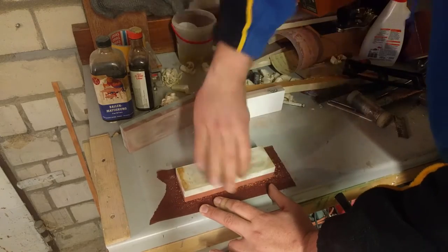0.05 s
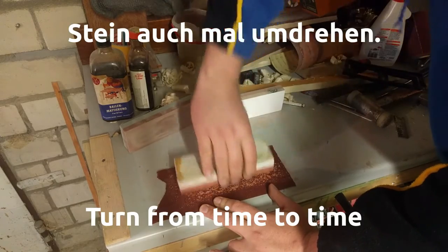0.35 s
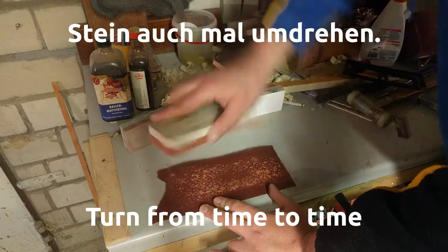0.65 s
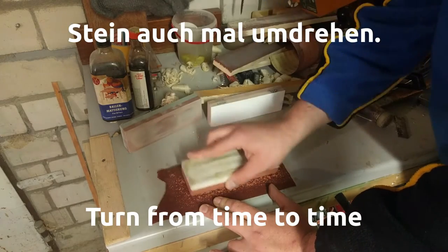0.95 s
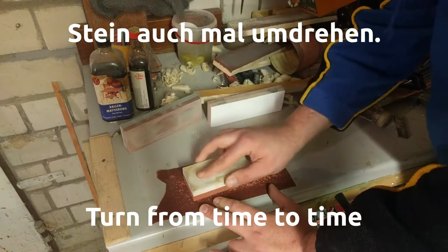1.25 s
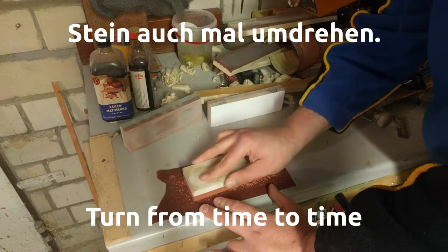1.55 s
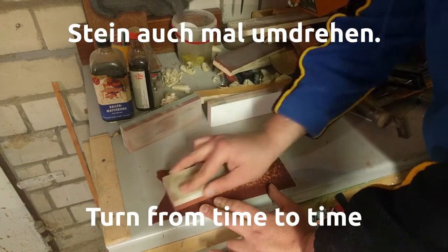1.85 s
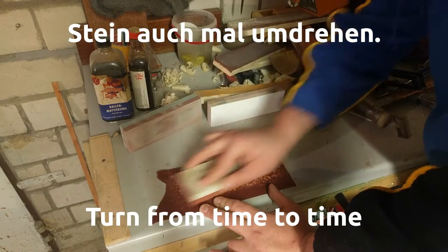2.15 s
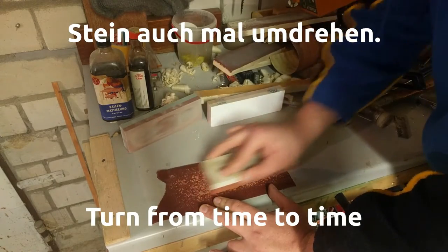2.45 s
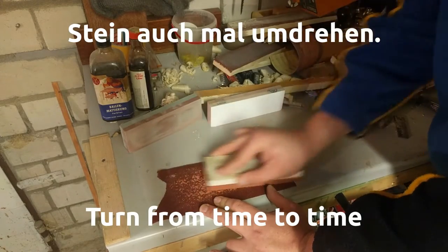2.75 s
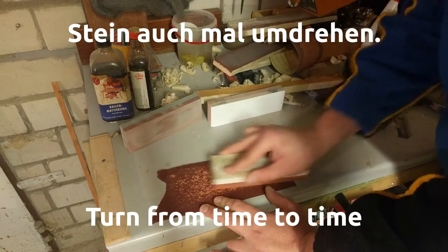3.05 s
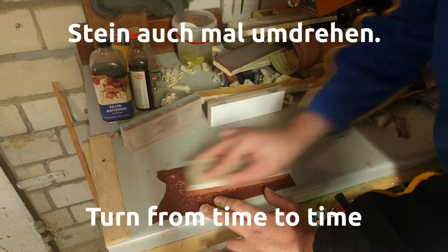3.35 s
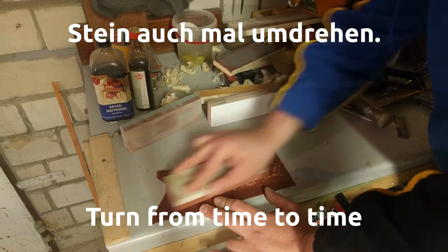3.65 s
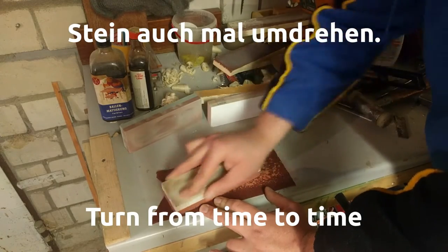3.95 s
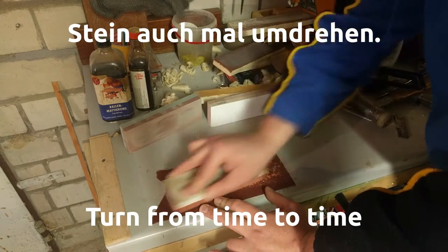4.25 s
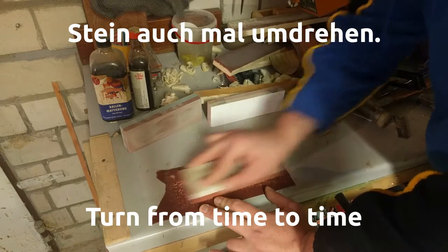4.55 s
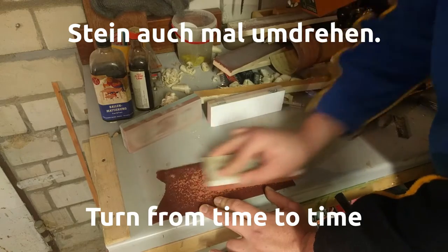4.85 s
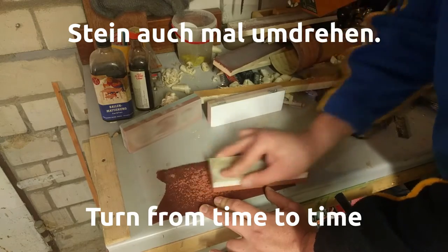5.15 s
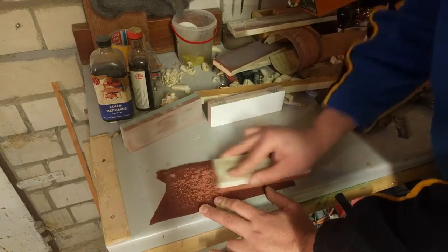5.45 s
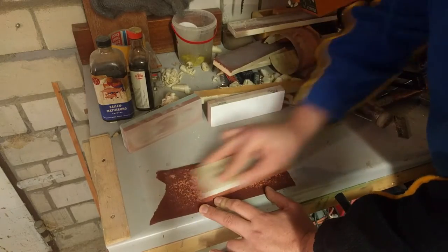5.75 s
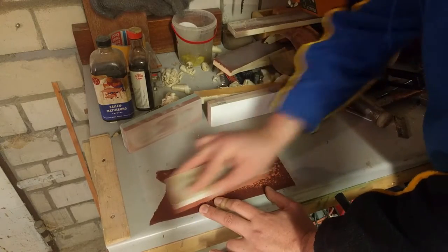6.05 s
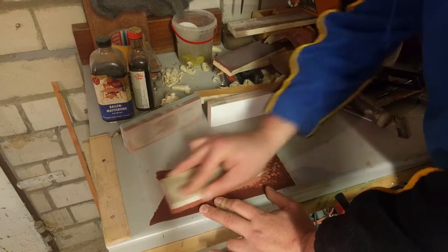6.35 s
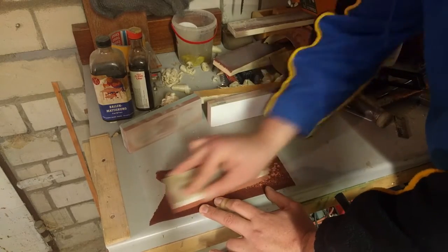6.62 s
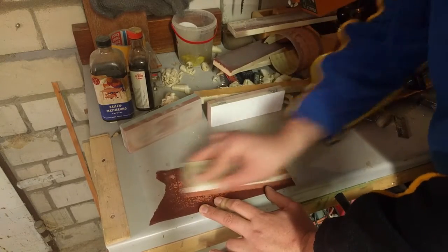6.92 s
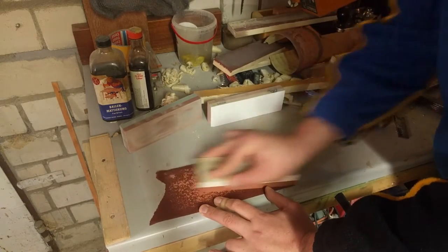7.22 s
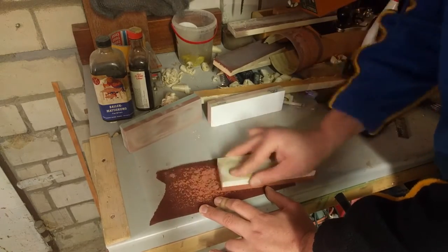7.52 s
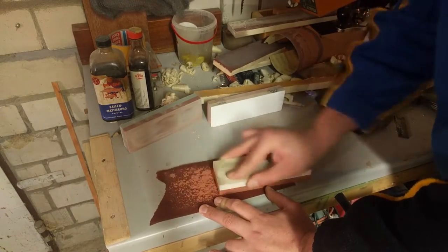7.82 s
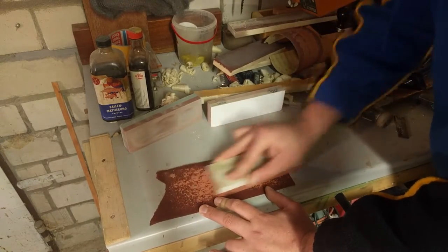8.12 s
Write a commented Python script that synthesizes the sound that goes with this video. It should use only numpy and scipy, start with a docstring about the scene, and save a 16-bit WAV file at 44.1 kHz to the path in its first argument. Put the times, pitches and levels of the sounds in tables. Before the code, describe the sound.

A quiet small workshop, heard close, with a faint sleeve rustle. At about 0.3 seconds a sharpening stone gives a short, bright, gritty scuff as it is lifted off abrasive paper. From about 0.9 to 1.2 seconds it comes down on the workbench in a quick cluster of dull knocks, edge first and then flat, with rasping and tiny cracks of grit. Another brief scuff near 1.5 seconds seats it. From 1.6 seconds a hand rubs the stone back and forth on the paper, about six strokes a second, in an even rhythm. Each stroke is a bright, grainy hiss with a coarse rasp, the push slightly rougher than the pull. The bench drones faintly underneath, a little more at first, and a short room echo fills the tiny rests. The scraping continues steadily until the end, at about 8 seconds.

```python
"""In a quiet workshop a sleeve rustles and a sharpening stone is picked up and turned, scuffing abrasive paper.
Around one second in it knocks down on the workbench, edge first and then flat.
From 1.6 s a hand laps it to and fro, six strokes a second: countless grains catch and snap under the
stone, while the bench drones beneath it and rocks at every turn.
The small room fills the short rests between the strokes, which go on to the end."""
import sys
import numpy as np
from scipy import signal
from scipy.fft import rfft, irfft, next_fast_len
from scipy.io import wavfile
from scipy.ndimage import uniform_filter1d

SR = 44100
rng = np.random.default_rng(int(sys.argv[2]) if len(sys.argv) > 2 else 0)


def wav_out(sig):
    """Save sig, one row per channel (or a flat mono array), as 16-bit PCM at SR to the path in sys.argv[1]."""
    wavfile.write(sys.argv[1], SR, np.round(np.clip(np.atleast_2d(sig).T, -1, 1) * 32767).astype(np.int16))


N = 360738
TIME = np.arange(N) / SR


def amp(db):
    return 10 ** (np.asarray(db) / 20)


def unit(x):
    return x / np.sqrt(np.mean(x ** 2) + 1e-20)


def curve_at(points, hz):
    """Breakpoints joined by straight lines over log frequency."""
    f, value = np.transpose(points)
    return np.interp(np.log(hz + 1), np.log(f + 1), value)


def eq(x, points):
    """Shapes x with an EQ curve in dB."""
    size = next_fast_len(N + SR)
    gain = amp(curve_at(points, np.fft.rfftfreq(size, 1 / SR)))
    return irfft(rfft(x, size) * gain, size)[..., :N]


def envelope(touches):
    """Each rubbing touch starts gently, steepens, holds and dies away."""
    gain = np.zeros(N)
    for start, attack_s, hold_s, release_s, db in touches:
        swell = np.clip((TIME - start) / attack_s, 0, 1) ** 1.54
        release = np.exp(-np.maximum(TIME - start - attack_s - hold_s, 0) / release_s)
        gain += amp(db) * swell * release
    return gain


def wander(hz):
    """A smooth random modulator of unit size, up to about hz."""
    step = 16
    count = N // step + 2
    f = np.fft.rfftfreq(count, step / SR)
    slow = unit(irfft(rfft(rng.standard_normal(count)) * np.exp(-(f / hz) ** 2), count))
    return np.interp(np.arange(N) / step, np.arange(count), np.clip(slow, -2, 2))


def grains(per_s, spread_db):
    """Mid and side trains of tiny snaps: most are small, a few are large."""
    size = amp(spread_db * np.minimum(rng.exponential(1, N), 4.5))
    snaps = rng.random(N) < per_s / SR
    return unit(size * snaps * rng.choice([-1., 1.], (2, N)))


def patchy(x, depth_db, patch_hz, patch_s):
    """The spots where stone meets paper keep changing, so bands swell and fade on their own."""
    hz, t, z = signal.stft(x, SR, nperseg=256)
    across = uniform_filter1d(rng.standard_normal(z.shape[1:]), max(1, round(patch_hz / hz[1])), axis=0)
    field = unit(uniform_filter1d(across, max(1, round(patch_s / t[1])), axis=1))
    return signal.istft(z * amp(depth_db * np.clip(field, -2, 2)), SR, nperseg=256)[1][:, :N]


# Room tone EQ: f/Hz, level/dB
ROOM_TONE_EQ = [(15, -35), (25, 13), (107, 0), (165, -4), (291, 0), (403, -25), (2030, -42), (4690, -23),
                (7030, -8), (9720, -26), (15800, -30)]
def room_tone():
    """A faint bed of rumble with a thin hiss on top."""
    return amp(-73.5) * unit(eq(rng.standard_normal((2, N)), ROOM_TONE_EQ))


# Reverb time of the workshop: f/Hz, t60/s
ROOM_DECAY = [(100, 1), (2000, 0.41), (7000, 0.1), (10000, 0.063), (15000, 0.073)]
def room_reverb(x, wet_db, blur_hz):
    """Adds the diffuse tail: each band stores the energy it is fed and lets it die at its own speed."""
    hz, t, z = signal.stft(x[0], SR, nperseg=256)
    fed = np.abs(uniform_filter1d(abs(z) ** 2, max(1, round(blur_hz / hz[1])), axis=0))
    feedback = amp(-60 * t[1] / curve_at(ROOM_DECAY, hz)) ** 2
    stored = np.array([signal.lfilter([0, 1 - r], [1, -r], band) for r, band in zip(feedback, fed)])
    noise = signal.stft(rng.standard_normal((2, N)), SR, nperseg=256)[2]
    tail = signal.istft(noise / noise.std() * np.sqrt(stored), SR, nperseg=256)[1][:, :N]
    return x + amp(wet_db) * tail


def early_reflections(x, wet_db, decay_s):
    """Adds echoes off the wall, bottles and tools: sparse taps of random sign."""
    t = TIME[:SR // 8]
    taps = rng.choice([-1., 1.], (2, len(t))) * (rng.random((2, len(t))) < 2500 / SR)
    taps *= (t > .002) * np.exp(-t / decay_s)
    return x + amp(wet_db) * signal.oaconvolve(x, taps / np.linalg.norm(taps[0]), axes=1)[:, :N]


# Cloth EQ: f/Hz, level/dB
CLOTH_EQ = [(25, -22), (70, 9.5), (250, 1.5), (700, -4), (2000, -9.5), (4500, -15), (7000, -5),
            (10000, -17), (15800, -14)]
# Sleeve moves: t/s, attack/s, hold/s, release/s, level/dB
SLEEVE_MOVES = [(0, 0.0018, .002, .022, -58.5), (.21, 0.074, 0.42, .035, -59.5),
                (.76, 0.026, 0.6, 0.21, -61.5), (1.38, .12, .01, .17, -52)]
def sleeve():
    """Cloth rustles as the arm reaches, turns the stone and settles."""
    return unit(eq(grains(per_s=4900, spread_db=1.0), CLOTH_EQ)) * envelope(SLEEVE_MOVES)


# Resonances of the bench: f/Hz, level/dB, t60/s
BENCH_MODES = [(64, -2, 0.03), (82.3, -15, 0.41), (90.8, -12, 0.33), (200, -12, 0.093), (227, -4, 0.042),
               (304.4, -5, 0.13), (317, -3.5, 0.11), (375, 1.5, 0.048), (526, -6, 0.17), (694, -4.5, 0.064),
               (766, -9.5, 0.08), (914, -2.5, 0.072), (1219, 2.5, 0.045), (1526, -7.5, 0.062),
               (2127, 1, 0.069)]
def bench(force):
    """The bench's modes answer a force and echo round the room; the slowest motion radiates nothing."""
    t = TIME[:SR // 2]
    signs = (-1) ** ((np.arange(len(BENCH_MODES)) + 1) // 2)  # the close bass pair starts in step
    ring = sum(sign * amp(db - 60 * t / t60) * np.sin(2 * np.pi * hz * t)
               for sign, (hz, db, t60) in zip(signs, BENCH_MODES))
    echo = signal.lfilter(*signal.butter(3, [260, 1150], "band", fs=SR), rng.standard_normal(len(t)))
    ring += amp(-1.5 - 60 * t / 0.24) * unit(echo) * (1 - np.exp(-t / 0.0036))
    radiated = signal.lfilter(*signal.butter(2, 48, "high", fs=SR), ring)
    return signal.oaconvolve(force, radiated)[:N]


def bench_shake(speed, pressure, load):
    """Friction shakes the bench in mid-stroke; it rocks as the hand slows to turn."""
    friction = patchy(grains(per_s=6000, spread_db=2.5), depth_db=3.5, patch_hz=400, patch_s=0.055)[0]
    friction = signal.lfilter(*signal.butter(2, 260, "high", fs=SR), friction)
    friction *= amp(-71 + 2 * speed + 2 * wander(hz=22.4)) * load
    rocking = wander(hz=120) * amp(-85.5 - 18 * speed + 4.1 * wander(hz=7.4))
    return pressure * (friction + rocking)


# Hits on the bench, edge first and then flat: t/s, level/dB, contact/s
LANDING_HITS = [(0.967, -30.5, 0.00052), (.98, -38, 0.0037), (1.048, -24, 0.0022), (1.133, -29.5, 0.00027),
                (1.144, -18, 0.0019)]
def stone_landing():
    """The force of the landing stone, cushioned by the paper: longer contact, duller thump."""
    force = np.zeros(N)
    for start, db, contact_s in LANDING_HITS:
        age = np.maximum(TIME - start, 0) / contact_s
        blow = age * np.exp(-np.minimum(age, 40))
        force += amp(db) * blow / blow.sum()
    return force


# Bright scuff EQ: f/Hz, level/dB
SCUFF_EQ = [(200, -28), (1200, -26.5), (2200, -20), (3500, -13), (5200, -4.5), (6700, 7.5), (7400, 3),
            (8500, -6), (11000, -16), (15800, -22)]
# Scuff cues: t/s, attack/s, hold/s, release/s, level/dB
SCUFF_CUES = [(0, 0.0014, .002, 0.016, -59), (.255, 0.016, .002, 0.016, -61), (.322, 0.06, .026, .011, -22),
              (.42, 0.02, .008, 0.015, -33), (.56, 0.027, .002, 0.021, -55.5),
              (.64, 0.033, .002, 0.023, -58), (.772, 0.017, .002, 0.0089, -46),
              (.932, 0.0087, .072, .055, -28), (1.06, 0.071, .002, 0.0098, -29.5),
              (1.372, 0.044, .002, 0.016, -42.5), (1.435, 0.075, .002, .007, -29),
              (1.535, 0.043, .002, .014, -40)]
def edge_scuffs():
    """A brief hiss fades away at the very start; then the stone's edge drags over the paper as it is lifted,
    set down and seated."""
    return unit(eq(grains(per_s=10000, spread_db=1.5), SCUFF_EQ)) * envelope(SCUFF_CUES)


# Dig cues: t/s, level/dB, decay/s
DIG_CUES = [(.358, -47, 0.057), (.9355, -37.5, 0.083), (1.094, -36.5, 0.015)]
def corner_digs():
    """A corner of the stone digs into the grit with a short, coarse rasp."""
    gain = sum(amp(db) * (TIME >= t) * np.exp(-abs(TIME - t) / decay_s) for t, db, decay_s in DIG_CUES)
    snaps = grains(per_s=3800, spread_db=2.5)
    return gain * unit(signal.lfilter(*signal.butter(2, [2300, 4800], "band", fs=SR), snaps))


# Bright hiss EQ, peaking near 7 kHz: f/Hz, level/dB
HISS_EQ = [(200, -58), (1500, -33.5), (2500, -27.5), (3500, -27.5), (5000, -13.5), (6000, -6), (6600, 0),
           (6950, 2.5), (7400, -1.5), (8200, -7), (9500, -13), (12000, -16.5), (15800, -21.5)]
def hiss_tone(x):
    """Gives x a bright, hissy tone with a peak near 7 kHz, at unit level."""
    return unit(eq(x, HISS_EQ))


# Crack cues: t/s, level/dB
CRACK_CUES = [(0.27, -43), (0.3214, -31), (.9512, -27), (1.119, -27), (1.4572, -30.5)]
def grain_cracks():
    """Single grains crack under the stone's edge, each a tick of noise."""
    gain = sum(amp(db) * (TIME >= t) * np.exp(-abs(TIME - t) / 0.0033) for t, db in CRACK_CUES)
    return gain * hiss_tone(rng.standard_normal((2, N)))


# Stroke cues and their pressure, pull and push in turn: t/s, level/dB
STROKE_CUES = [(1.582, -15.5), (1.754, -12), (1.939, -12), (2.119, -11), (2.29, -11.5), (2.468, -11),
               (2.635, -12), (2.812, -11.5), (2.98, -11.5), (3.148, -11), (3.327, -11), (3.494, -11.5),
               (3.671, -11), (3.842, -11), (4.013, -11.5), (4.18, -10.5), (4.354, -11), (4.526, -10.5),
               (4.691, -11.5), (4.861, -11.5), (5.04, -11), (5.204, -11), (5.374, -12.5), (5.545, -11),
               (5.717, -11.5), (5.886, -11), (6.064, -11), (6.232, -11), (6.395, -11.5), (6.559, -11.5),
               (6.726, -11), (6.894, -11.5), (7.067, -11), (7.232, -11.5), (7.395, -11.5), (7.563, -10.5),
               (7.728, -11.5), (7.894, -10), (8.056, -12)]
# Feel of each direction: closing rest/s, pressure ramp/dB, rasp level/dB, bench load/dB
PULL_FEEL = (0.01, -1.5, -2.6, -0.7)
PUSH_FEEL = (.014, 0.18, -0.85, 0.84)
# The arm leans hard on the bench at first, then eases off: t/s, level/dB
ARM_WEIGHT = [(1.6, 6.5), (2.1, 3), (6, 1.4), (7.1, 1), (8.2, 1)]
def hand_motion():
    """The hand's speed (0 to 1), place (-1 far, 1 near) and gains for pressure, rasp and bench load."""
    speed, place, pressure, coarse, load = np.zeros((5, N))
    turns_s = [start for start, db in STROKE_CUES[1:]] + [8.228]
    for k, ((start, db), turn) in enumerate(zip(STROKE_CUES, turns_s)):
        rest_s, ramp_db, rasp_db, load_db = PUSH_FEEL if k % 2 else PULL_FEEL
        span = slice(round(start * SR), round(turn * SR))  # pressure holds through the rest
        progress = np.clip((TIME[span] - start) / (turn - rest_s - start), 0, 1)
        speed[span] = np.maximum(np.sin(np.pi * progress ** 0.81), 0)  # quick away, slower to rest
        place[span] = -(-1) ** k * np.cos(np.pi * progress)
        pressure[span] = amp(db + ramp_db * (progress - .5))
        coarse[span] = amp(rasp_db)
        load[span] = amp(load_db + np.interp(start, *np.transpose(ARM_WEIGHT)))
    return speed, place, pressure, coarse, load


# EQs of coarse grit and of fresh, sharp grit: f/Hz, level/dB
RASP_EQ = [(150, -13), (400, -21), (1500, -11), (2500, -9), (3700, 3.5), (5200, 5), (7000, 2),
           (11000, -9.5)]
FIZZ_EQ = [(2000, -43), (6500, 6.5), (9000, 8.5), (11500, 2), (14500, 1.5), (15800, 0)]
def lapping(speed, place, pressure, coarse):
    """Fine grit hisses once the stone slides; with speed, coarse grains rasp and fresh patches fizz."""
    chatter = amp(0.58 * wander(hz=258) + 0.36 * wander(hz=59.7))
    bite = speed ** 2 / (speed ** 2 + 0.32 ** 2)  # opens as soon as the stone breaks loose
    hiss = hiss_tone(grains(per_s=14000, spread_db=1.0) * chatter)
    hiss *= amp(-4.0) * bite * amp(1.8 * (speed - 1)) + amp(-22)  # never quite silent in the turns
    clumps = amp(4 * wander(hz=35))
    rasp = unit(eq(grains(per_s=5000, spread_db=2.0) * chatter * clumps, RASP_EQ))
    rasp *= amp(-17.5) * speed ** 0.61 * coarse
    flares = amp(6.2 * wander(hz=24))
    fizz = unit(eq(grains(per_s=13000, spread_db=4.5) * flares, FIZZ_EQ))
    fizz *= amp(-13.0 + 2.9 * place) * speed ** 2.8  # the near end of the paper is sharper
    return patchy(pressure * (hiss + rasp + fizz), depth_db=1.44, patch_hz=1252, patch_s=.035)


# Stereo width, as an EQ on the side channel: f/Hz, level/dB
SIDE_EQ = [(1000, -36), (3000, -75), (5000, -21), (7000, -118), (9000, -52), (11000, -7.5), (13000, -8.5),
           (15800, -3)]
def scene():
    """Mixes in mid and side, then left and right: the bench sits centre, only the top treble is wide."""
    speed, place, pressure, coarse, load = hand_motion()
    foley = sleeve() + lapping(speed, place, pressure, coarse)
    foley += edge_scuffs() + corner_digs() + grain_cracks()
    foley = early_reflections(foley, wet_db=-9.5, decay_s=0.019)
    mid, side = room_tone() + amp(-2.5) * room_reverb(foley, wet_db=-5.0, blur_hz=520)
    mid += bench(bench_shake(speed, pressure, load) + stone_landing())
    side = eq(side, SIDE_EQ)
    return np.array([mid + side, mid - side])


def record(dry):
    """A steep high cut on the master."""
    high_cut = signal.firwin(801, cutoff=15830, window=("kaiser", 9), fs=SR)
    return signal.oaconvolve(dry, high_cut[None], "same")


dry = scene()
out = record(dry)
wav_out(out)
```